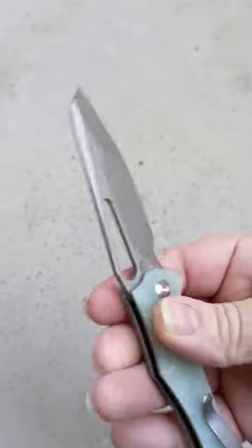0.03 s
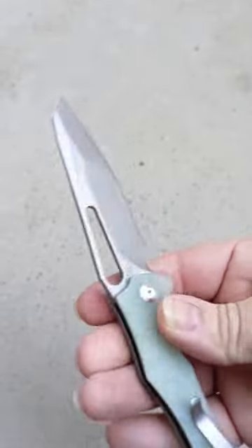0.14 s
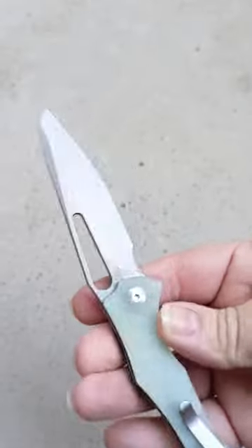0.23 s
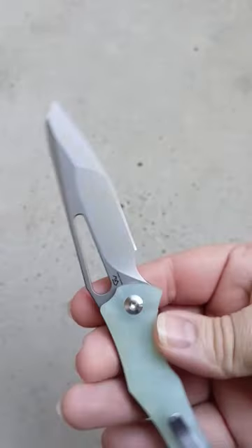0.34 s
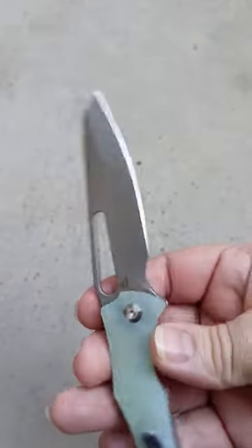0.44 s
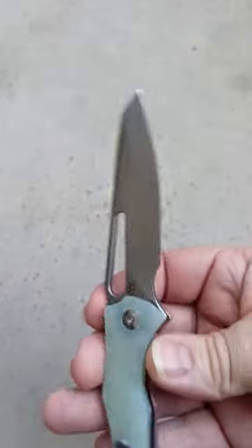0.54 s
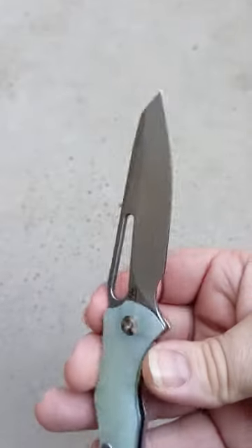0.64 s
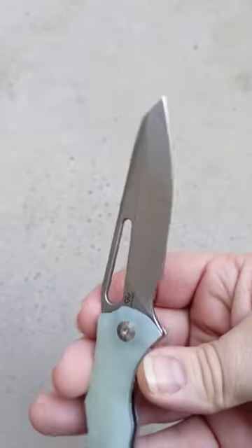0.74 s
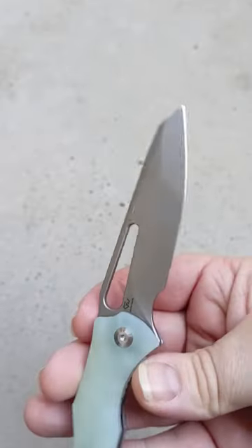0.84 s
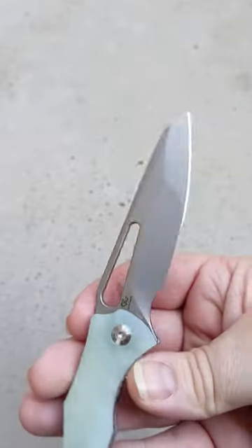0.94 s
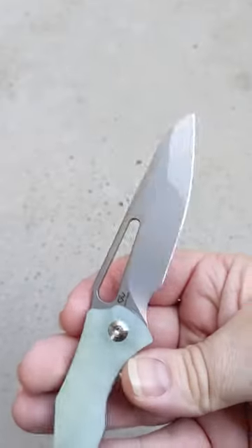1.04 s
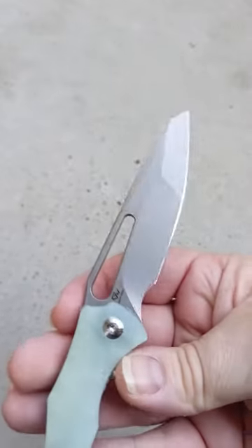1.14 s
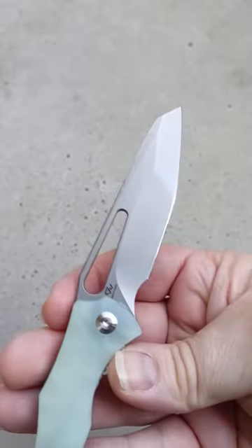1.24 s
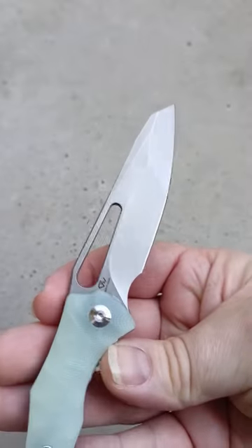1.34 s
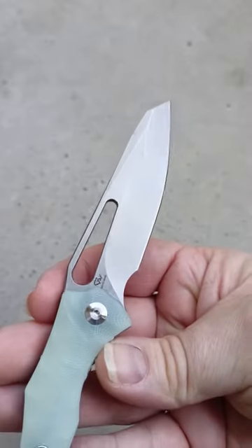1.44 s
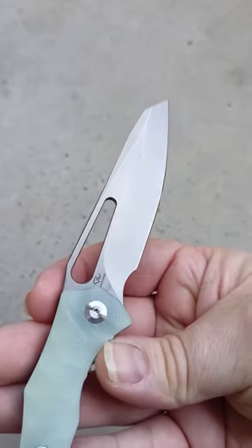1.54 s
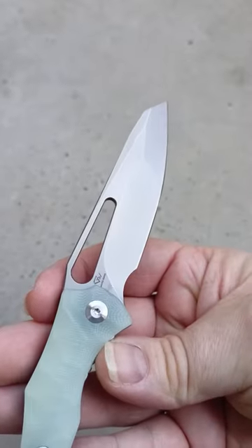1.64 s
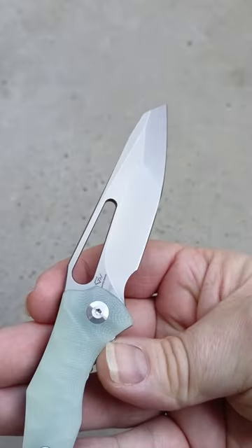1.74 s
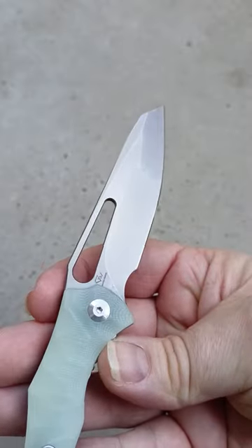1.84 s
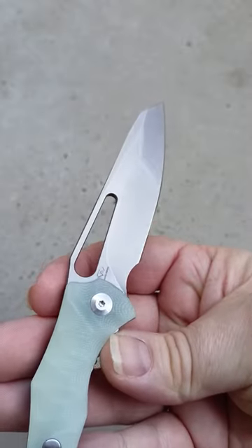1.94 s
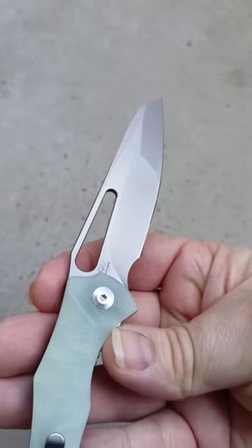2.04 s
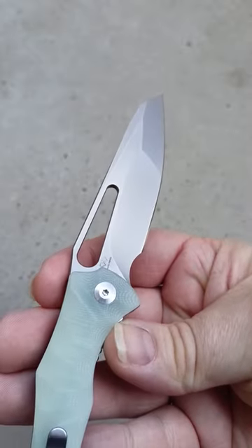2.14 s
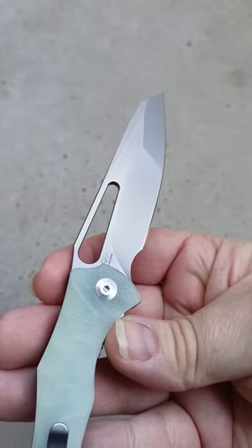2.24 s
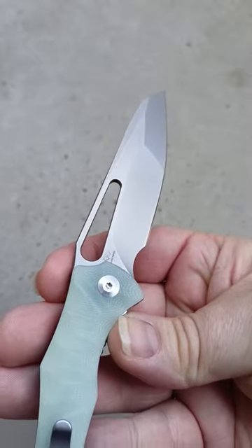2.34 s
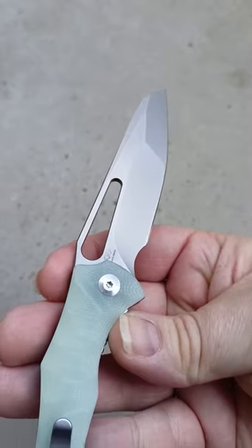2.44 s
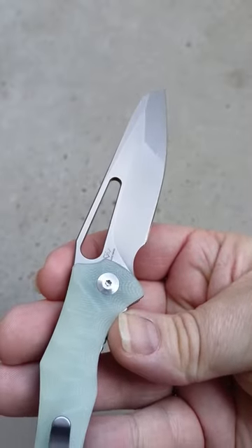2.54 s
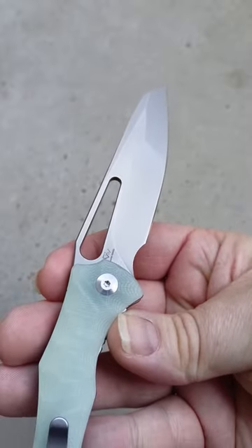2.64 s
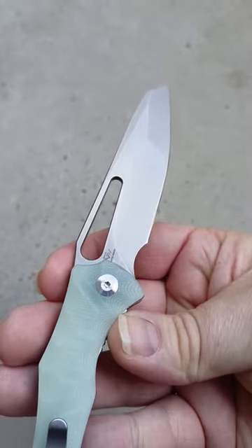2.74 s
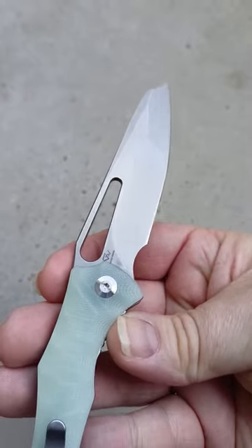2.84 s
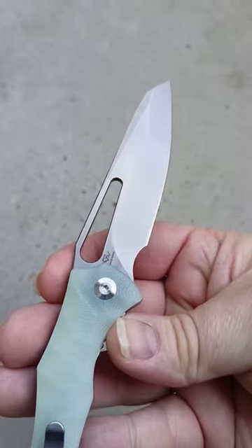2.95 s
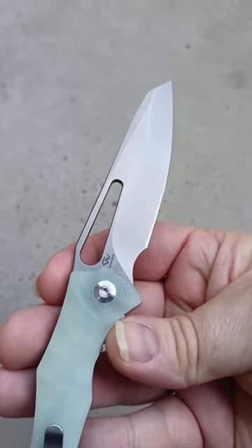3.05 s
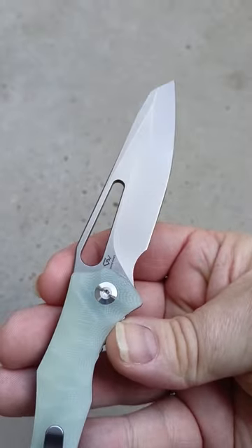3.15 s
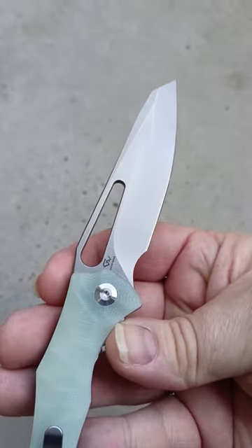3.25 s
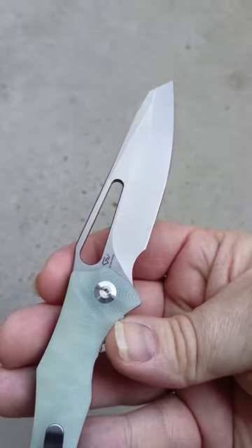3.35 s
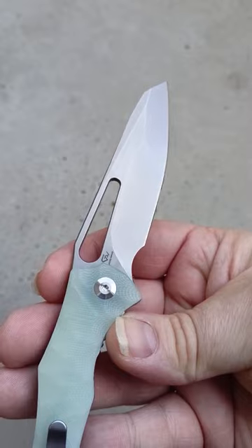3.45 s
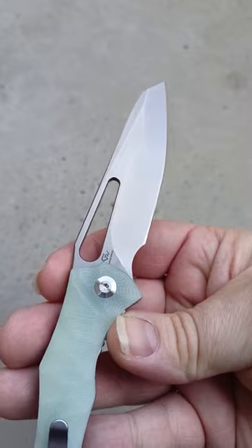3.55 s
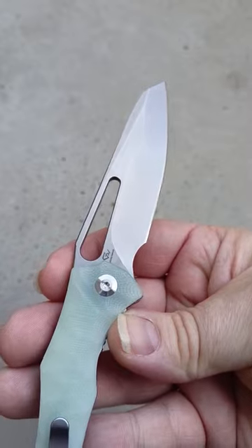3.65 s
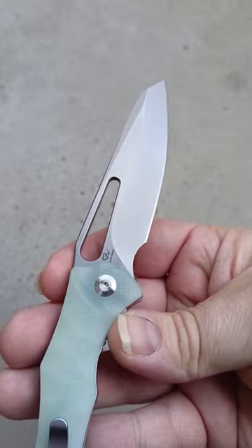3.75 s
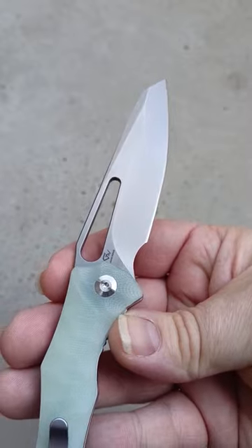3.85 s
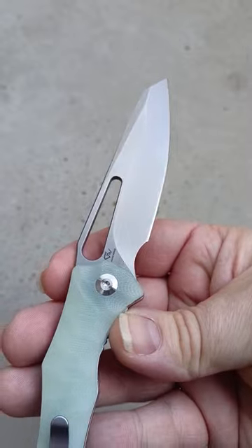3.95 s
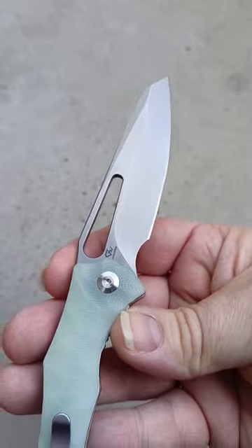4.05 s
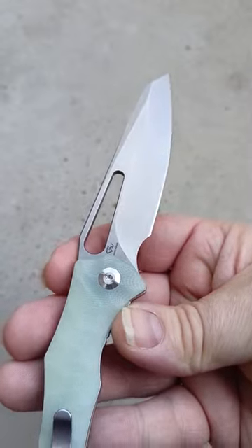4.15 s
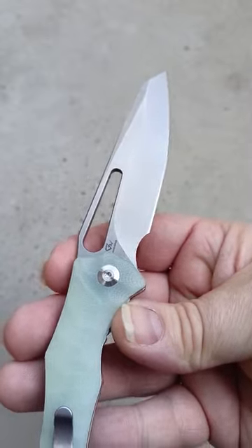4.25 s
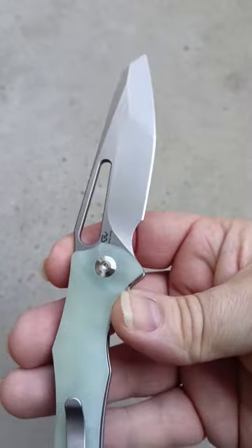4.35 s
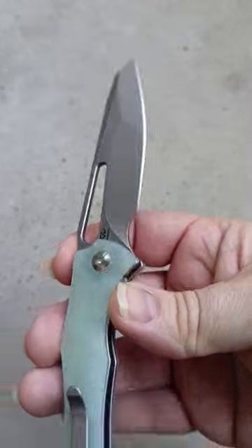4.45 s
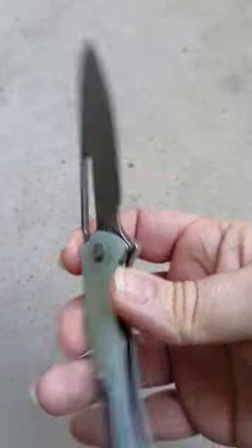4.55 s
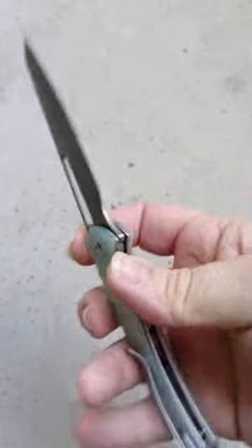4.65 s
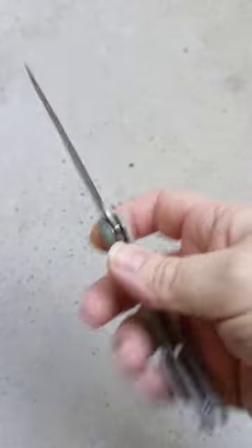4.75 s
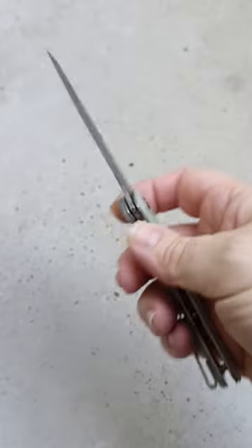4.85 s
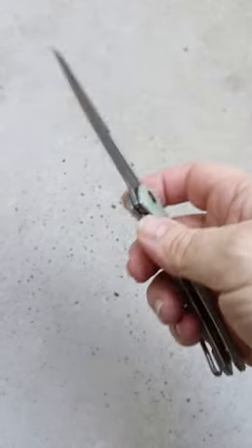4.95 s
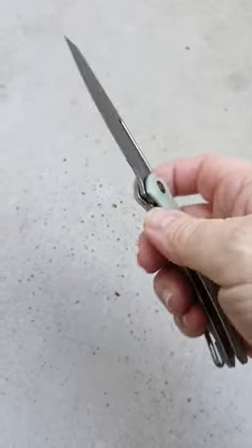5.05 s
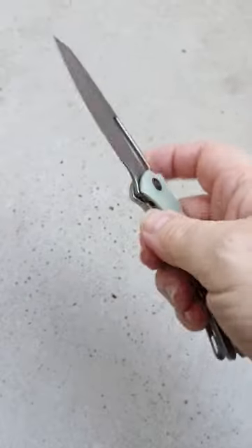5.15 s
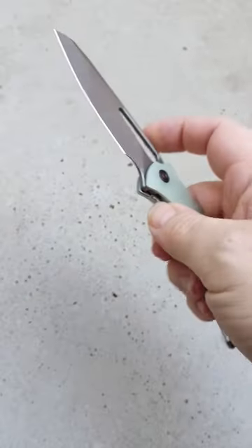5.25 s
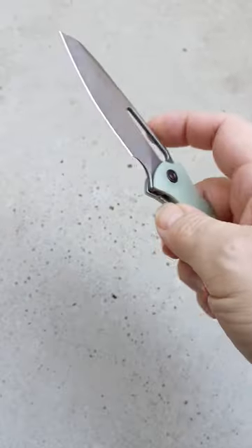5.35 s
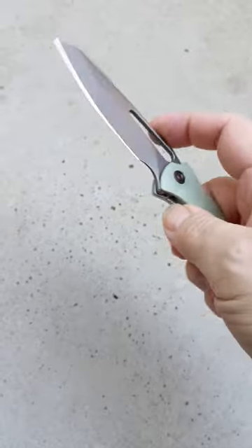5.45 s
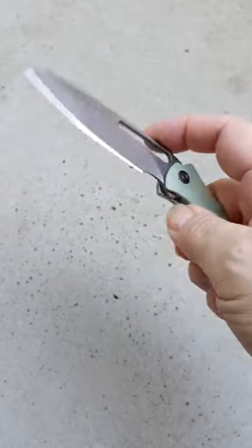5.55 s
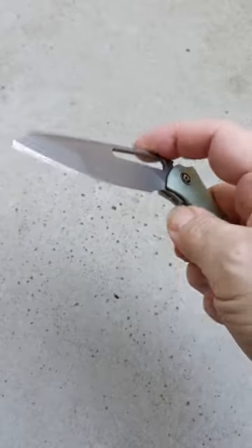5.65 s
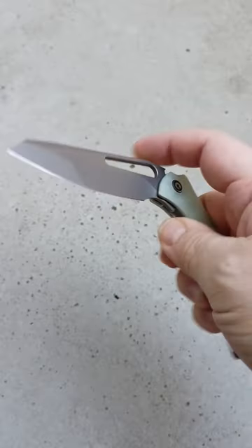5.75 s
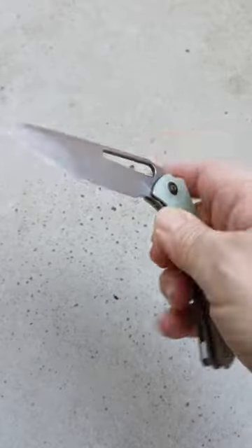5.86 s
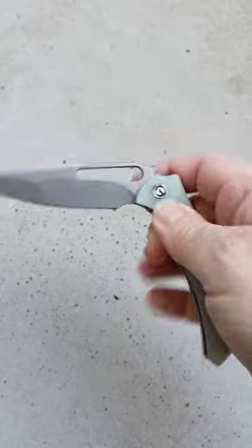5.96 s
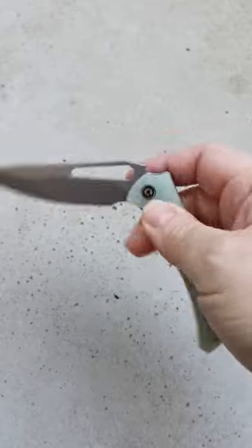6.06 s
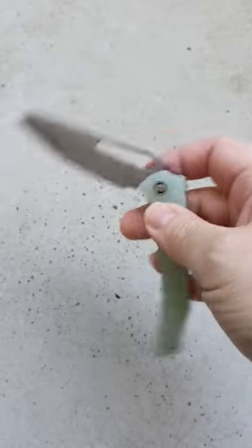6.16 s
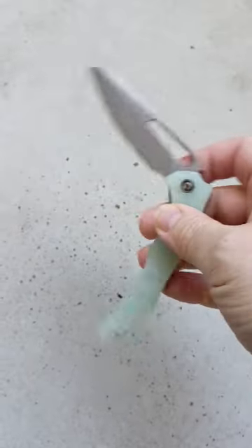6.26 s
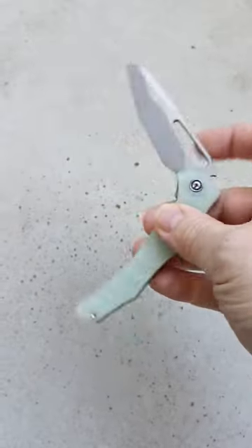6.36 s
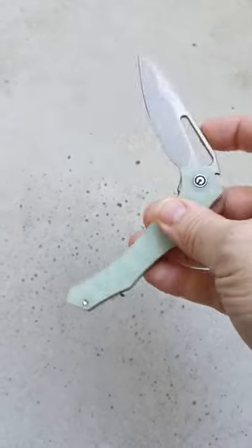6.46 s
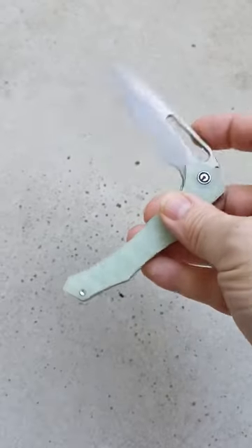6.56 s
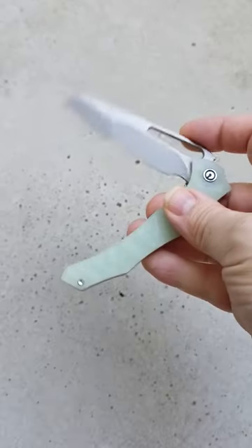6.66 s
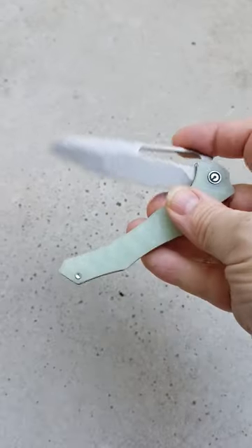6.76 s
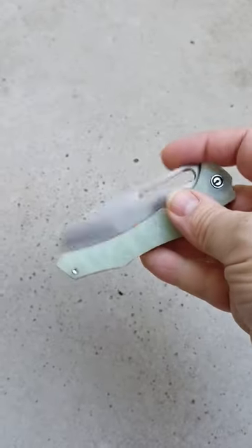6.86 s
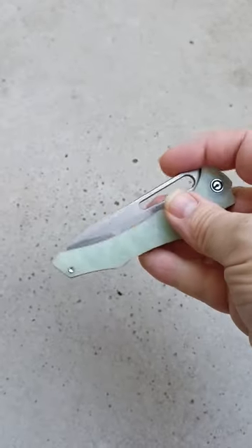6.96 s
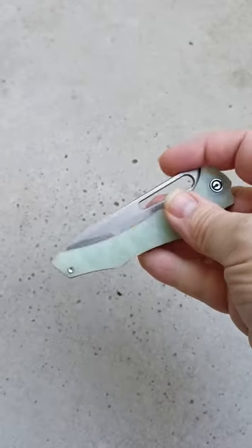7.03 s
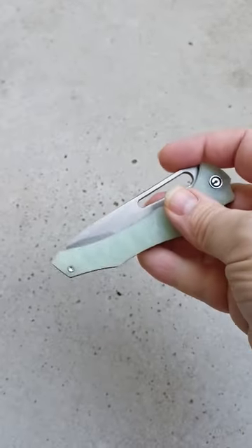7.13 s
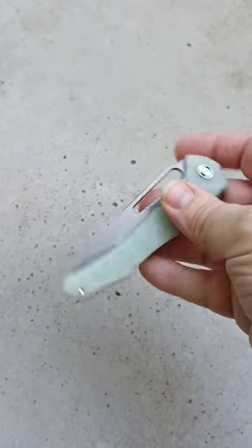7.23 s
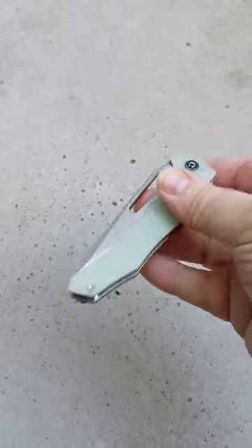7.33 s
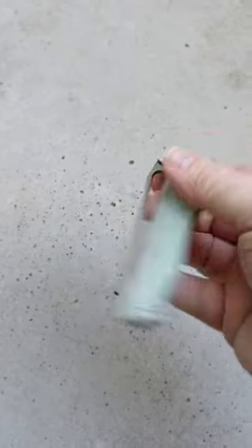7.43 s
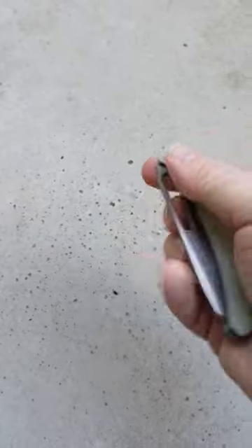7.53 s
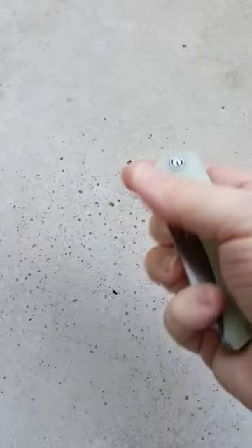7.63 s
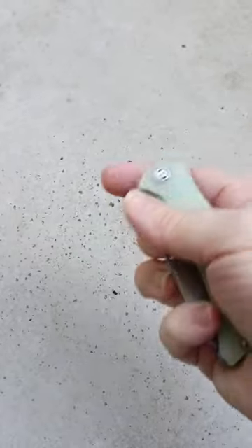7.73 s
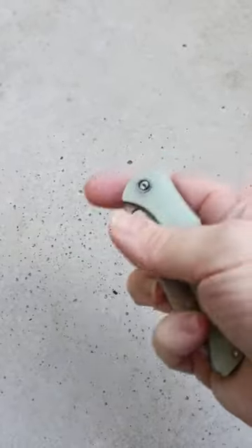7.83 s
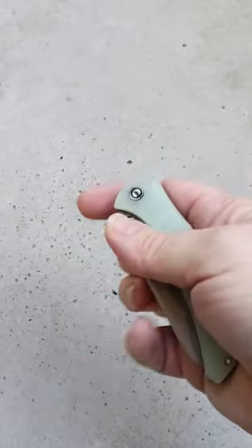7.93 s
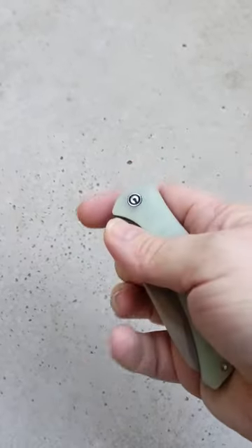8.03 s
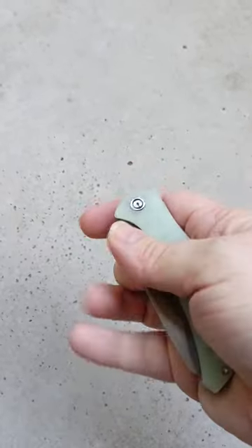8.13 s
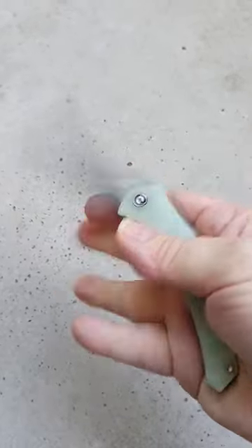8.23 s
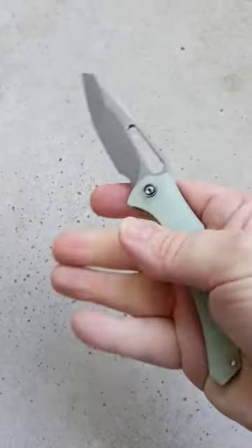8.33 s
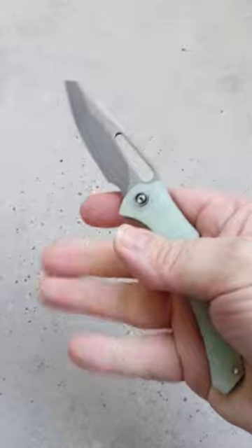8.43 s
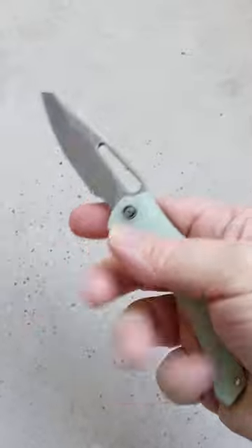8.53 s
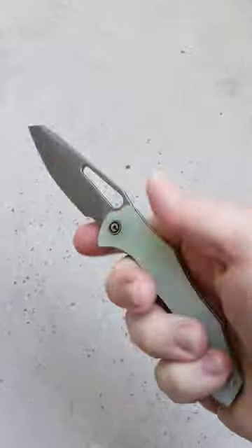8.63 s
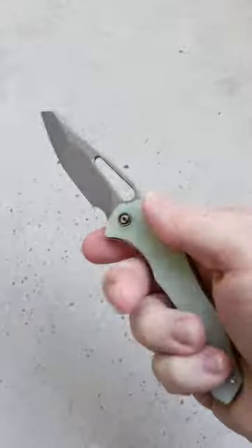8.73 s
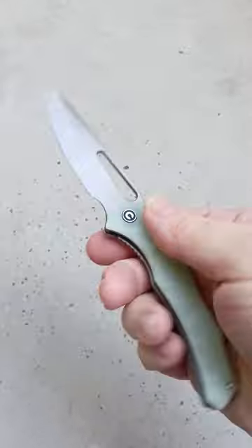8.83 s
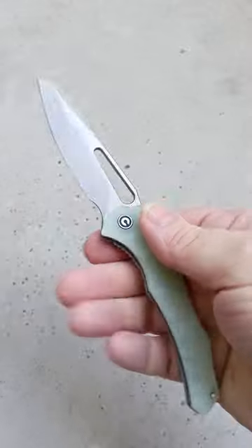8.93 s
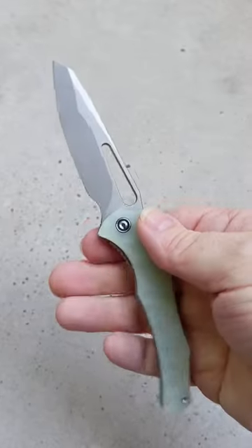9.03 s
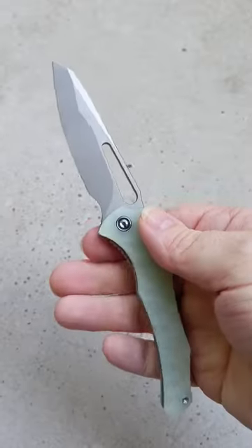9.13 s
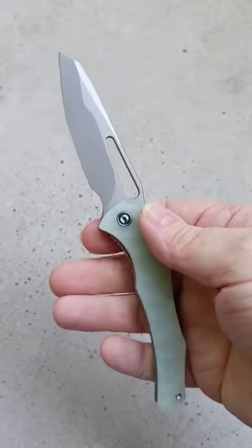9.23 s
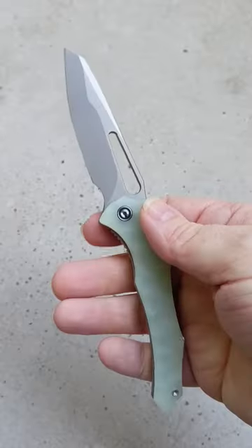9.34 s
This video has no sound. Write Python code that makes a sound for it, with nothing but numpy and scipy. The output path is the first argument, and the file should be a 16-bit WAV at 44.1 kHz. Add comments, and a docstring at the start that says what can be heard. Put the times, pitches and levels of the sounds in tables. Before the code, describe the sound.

Sparrows chirp between hard walls over faint town rumble and soft dove coos, while a folding knife closes with a click, then snaps open sharply.

```python
"""A town rumbles far off while a far flock chatters; from half a second near sparrows chirp between hard walls.
Faint tones join at 1 s, then a dove coos. Close by, a folding knife is unlocked (5.7 s), folded shut (7.1 s)
and flicked open (8.4 s). Birds are gliding whistles, the dove soft sines, the knife ringing steel modes,
the rest shaped noise. A phone's noise suppressor lets the background up while birds or knife sound and
holds it down between."""
import sys
import numpy as np
from scipy import signal
from scipy.io import wavfile
from scipy.ndimage import uniform_filter1d

SR = 44100
rng = np.random.default_rng(int(sys.argv[2]) if len(sys.argv) > 2 else 0)


def dump_mix(stems):
    """Bounce the given channels to the path in sys.argv[1] as a 16-bit WAV at rate SR."""
    frames = np.atleast_2d(stems).T  # one column per channel
    limited = np.clip(frames, -1, 1)  # hard clip at full scale
    pcm = np.round(limited * 32767).astype(np.int16)
    wavfile.write(sys.argv[1], SR, pcm)


N = 414099
T = np.arange(N) / SR

# pitch of an arched call, before each call's pitch factor: t from the top/s, f/Hz
ARCH_CALL = [(-.04, 3100), (-.025, 3300), (.001, 4150), (.02, 4350), (.038, 3500), (.048, 3200)]
# loudness at the same points, before each call's own level: level/dB, octave relative to the whistle/dB
ARCH_LEVELS = [(-22, -23), (-4.5, -17), (7, -28.5), (-9.5, -31), (-15.5, -14.5), (-32, -26.5)]
# steel contacts as the knife opens: t/s, level going into the modes/dB, chatter length/ms
OPEN_BLOWS = [(8.4137, -23.5, 1.1), (8.4162, -39, 1.5), (8.4198, -14, 3.5), (8.4247, -28, 4.2),
              (9.116, -58, 0.82)]


def from_db(db):
    """Turn decibels into a gain."""
    return 10 ** (np.asarray(db) / 20)


def rms_one(x):
    """Scale to an average (rms) strength of 1."""
    return x / np.sqrt(np.mean(x ** 2) + 1e-20)


def in_time(rows):
    """Draw every column of a curve sample by sample, with straight lines between its points."""
    s, *columns = np.transpose(rows)
    return [np.interp(T, s, column) for column in columns]


def shaky(count, size):
    """Smooth random wandering with spread 1; a larger size (samples) wanders more slowly."""
    once = uniform_filter1d(rng.standard_normal(count), size=size)
    return rms_one(uniform_filter1d(once, size=size))


def settle(x, time_s):
    """Follow a signal with a lag: one-pole smoothing."""
    r = np.exp(-1 / (time_s * SR))
    return signal.lfilter([1 - r], [1, -r], x)


def add(track, s, sound):
    """Mix a sound in at time s."""
    i = max(round(s * SR), 0)
    track[i:i + len(sound)] += sound[:N - i]


def coloured(spectrum, patchy_db, patch_bins):
    """Noise with the given spectrum, mottled in small patches of time and pitch; rms 1."""
    hz, level_db = np.transpose(spectrum)
    grid, _, cells = signal.stft(rng.standard_normal(N), SR, nperseg=1024)
    patches = uniform_filter1d(rng.standard_normal(cells.shape), size=6, axis=1)
    patches = rms_one(uniform_filter1d(patches, size=patch_bins, axis=0))
    shape_db = np.interp(np.log(grid + 1), np.log(hz), level_db, left=-80, right=-80)
    shaped = cells * from_db(shape_db[:, None] + patchy_db * patches)
    return rms_one(signal.istft(shaped, SR, nperseg=1024)[1][:N])


def echoes(x, t60, rise_s):
    """Dense reflections: convolution with noise of unit energy that rises, then dies 60 dB in t60 seconds."""
    t = np.arange(SR) / SR
    tail = rng.standard_normal(SR) * from_db(-60 * t / t60) * np.clip(t / rise_s, 0, 1)
    return signal.fftconvolve(x, tail / np.sqrt(np.sum(tail ** 2)))[:N]


def ring(x, hz, t60):
    """One way a body rings: a unit click sets off a sine of height about 1 that dies 60 dB in t60 seconds."""
    r, w = from_db(-60 / (t60 * SR)), 2 * np.pi * hz / SR
    return signal.lfilter([0, np.sin(w)], [1, -2 * r * np.cos(w), r * r], x + 1e-18)


def bursts(starts, holds, levels_db, rise_db_per_s, fall_db_per_s):
    """Gain of overlapping bursts: each rises, holds and falls at steady rates in dB."""
    t = T[::64, None]
    rise_db = rise_db_per_s * np.maximum(starts - t, 0)
    fall_db = fall_db_per_s * np.maximum(t - starts - holds, 0)
    gains = from_db(levels_db - rise_db - fall_db)
    return np.interp(T, t[:, 0], np.sqrt(np.sum(gains ** 2, axis=1)))


def chirp(call, levels, factor):
    """One call: the bird's syrinx makes a gliding, warbling whistle with a harsher octave."""
    warble_hz, rasp_depth = 90, 0.55   # spread of the unsteady pitch and of the rough loudness
    (s, hz), (level_db, octave_db) = np.transpose(call), np.transpose(levels)
    t = np.arange(s[0], s[-1], 1 / SR)
    pitch_hz = np.interp(t, s, hz) * factor + warble_hz * shaky(len(t), size=40)
    phase = 2 * np.pi * np.cumsum(pitch_hz) / SR
    octave = from_db(np.interp(t, s, octave_db)) * shaky(len(t), size=40) * np.sin(2 * phase)
    rasp = 1 + rasp_depth * shaky(len(t), size=130)
    return np.sqrt(2) * rasp * from_db(np.interp(t, s, level_db)) * (np.sin(phase) + octave)


def town_rumble(open_db):
    """The far town: low, patchy noise that the suppressor lifts by its full opening."""
    # spectrum: f/Hz, relative level per Hz/dB
    rumble_spectrum = [(15, -41), (25, -23), (90, 0.5), (199, -3.5), (267, -4), (339, -8.5), (474, -8.5),
                       (624, -16.5), (791, -14.5), (2040, -24), (2800, -24.5), (3640, -28.5), (6160, -120)]
    # level while held down: t/s, level/dB
    held_levels = [(0, -69), (.8, -66.5), (1.55, -62.5), (2.1, -68.5), (2.6, -66.5), (3.2, -65),
                   (4.3, -65.5), (5.0, -66), (5.8, -64.5), (6.6, -62.5), (7.3, -67.5), (8.0, -65),
                   (8.9, -65.5), (9.39, -65.5)]
    return from_db(in_time(held_levels)[0] + open_db) * coloured(rumble_spectrum, 2.5, patch_bins=2)


def flock(level_db, pitch_hz):
    """Far birds overlap and arrive as reflections only, a fluttering chatter that is already under way."""
    calls_per_s, slot_s = 35.0, .02
    calls = np.zeros(N)
    starts = np.arange(0, N / SR, slot_s)
    draws = rng.random((len(starts) + 2, 2))
    for s, (chance, u) in zip(starts, draws):
        if chance < calls_per_s * slot_s:
            factor = pitch_hz[int(s * SR)] / 3950 * (.86 + 0.34 * u)
            add(calls, s, chirp(ARCH_CALL, ARCH_LEVELS, factor))
    blurred = echoes(calls, 0.76, 0.039) + 0.43 * echoes(calls, .1, .01)
    # echoes of earlier calls, borrowed from the end of the scene, are still dying at the start
    half = SR // 2
    earlier = np.roll(calls, half)[:half]
    blurred[:half] += echoes(earlier, 0.23, 0.016)[half:SR]
    even = np.sqrt(uniform_filter1d(blurred ** 2, size=3000) + 0.0012)   # evens out the loudness
    return from_db(level_db) * blurred / even


def far_flock():
    """The flock chatters softly throughout and breaks out now and then."""
    # outbursts: t/s, hold/s, level/dB, guiding pitch f/Hz
    outbursts = [(0.0, 0.088, -66, 3724), (1.112, 0.027, -54, 3754), (1.311, 0.057, -48, 4010),
                 (1.681, 0.028, -60.5, 4360), (2.226, 0.1, -64, 4060), (2.816, 0.084, -69.5, 4660),
                 (3.476, 0.12, -47, 3900), (3.679, 0.093, -57.5, 4083), (4.01, 0.033, -49, 4050),
                 (4.59, 0.15, -60, 4160), (5.025, 0.009, -61.5, 4207), (5.242, .02, -45, 4090),
                 (5.298, 0.058, -45.5, 3940), (5.96, 0.075, -47, 4170), (6.21, 0.13, -51, 3730),
                 (6.849, 0.085, -52, 4615), (7.565, 0.071, -70.5, 4190), (7.97, 0.089, -65.5, 4120),
                 (8.178, .08, -48.5, 3777), (8.503, 0.14, -54.5, 4090), (9.095, 0.063, -54.5, 4630),
                 (9.337, .06, -52, 4995)]
    rise_db_per_s, fall_db_per_s, quiet_db = 245.5, 173.5, -80.5
    s, hold_s, db, hz = np.transpose(outbursts)
    gain = from_db(quiet_db) + bursts(s, hold_s, db, rise_db_per_s, fall_db_per_s)
    return flock(20 * np.log10(gain), np.interp(T, s, hz))


def suppressor_opening(loud):
    """How far the suppressor lets the background up, in dB; it lags, so brief clicks open it little."""
    threshold_db, share, widest_db = -66, 0.53, 10.5   # opens by a share of the excess, up to a limit
    listens_s, moves_s = 0.0072, 0.026
    level_db = 10 * np.log10(settle(loud ** 2, listens_s) + 1e-12)
    return settle(np.clip(share * (level_db - threshold_db), 0, widest_db), moves_s)


def treble(open_db):
    """Thin twitter and the hiss above it, both shaped noise: a bed that follows the suppressor, and bursts."""
    # twitter spectrum: f/Hz, relative level per Hz/dB
    twitter_spectrum = [(3530, -29), (6000, -8), (7170, -8.5), (7740, -11.5), (8130, -22), (9000, -28),
                        (11700, -53.5), (19800, -120)]
    # hiss spectrum: f/Hz, relative level per Hz/dB
    hiss_spectrum = [(4880, -34), (8300, -11), (8970, -11), (10900, -4), (11500, -0.5), (12600, -12),
                     (14900, -12), (15700, -22)]
    # bursts: t/s, hold/s, twitter level/dB, hiss level/dB
    treble_bursts = [(0.214, .02, -95, -84), (0.515, .02, -73, -87), (0.996, 0.063, -67, -76),
                     (1.21, 0.022, -52, -65.5), (1.312, 0.066, -64, -82), (1.64, 0.17, -65.5, -79.5),
                     (2.224, .01, -69, -78), (2.81, .01, -75, -97), (3.215, .08, -79, -108),
                     (3.407, 0.06, -51, -68), (3.99, 0.14, -57, -87), (4.3, 0.18, -79, -106),
                     (4.564, .04, -76, -81), (4.653, 0.1, -62, -76), (5.19, .02, -53.5, -63),
                     (5.887, .15, -74, -77), (6.11, 0.066, -51.5, -63), (6.22, 0.11, -63.5, -69.5),
                     (6.84, 0.044, -57.5, -71), (7.575, 0.11, -74.5, -75.5), (8.09, .06, -69, -71.5),
                     (8.183, 0.018, -58, -74), (8.5, 0.11, -65, -78), (8.994, .02, -70, -80),
                     (9.1, 0.023, -59.5, -78), (9.332, .02, -57, -71)]
    s, hold_s, twitter_db, hiss_db = np.transpose(treble_bursts)
    rates = 200, 161   # rise and fall, dB per s
    # each bed: level while held down in dB, then how strongly it follows the opening
    twitter = from_db(-85.5 + 0.99 * open_db) + bursts(s, hold_s, twitter_db, *rates)
    hiss = from_db(-95 + 1.7 * open_db) + bursts(s, hold_s, hiss_db, *rates)
    return (twitter * coloured(twitter_spectrum, 5.8, patch_bins=8)
            + hiss * coloured(hiss_spectrum, 1.4, patch_bins=12))


def sparrows():
    """Near birds: the direct sound with the nearest wall, and the echoes of the yard."""
    # pitch of the long call, before the pitch factor: t from the leap/s, f/Hz
    long_call = [(-.07, 3350), (-.035, 3550), (-.004, 4200), (-.003, 5300), (.003, 5980), (.022, 5900),
                 (.028, 5500), (.031, 4750), (.048, 4400), (.06, 3700), (.088, 3050), (.1, 3000)]
    # its loudness, before each call's level: level/dB, octave relative to the whistle/dB
    long_levels = [(-39.5, 11.5), (-16.5, 3), (2.5, -17.5), (-12.5, -13), (5, -24.5), (3, -20.5),
                   (5.5, -17.5), (-0.5, -20.5), (-13, -23), (-7, -12.5), (-8, -12.5), (-37.5, -22)]
    # long calls: t/s, direct level/dB, echo level/dB, pitch factor
    long_calls = [(0.512, -64.5, -60.5, 0.93), (0.963, -57, -50, 1.02), (1.209, -57, -52, 0.93),
                  (1.713, -59.5, -56.5, 0.98), (2.224, -64, -61, 0.98), (3.35, -49, -49.5, 1.003),
                  (3.972, -49, -50, 0.96), (4.613, -51, -53, 1.007), (5.169, -58, -49.5, 0.99),
                  (5.256, -43.5, -47, 0.97), (5.924, -50, -49.5, .99), (6.139, -51, -45.5, 1),
                  (6.82, -53.5, -53.5, 0.95), (8.093, -52, -45, 0.97), (9.048, -57, -60, 1.02),
                  (9.318, -57, -47.5, 0.89)]
    # pitch of the short call, before the pitch factor: t from the leap/s, f/Hz
    short_call = [(-.03, 3500), (-.012, 3800), (.001, 4650), (.035, 4700), (.048, 4000), (.058, 3500),
                  (.07, 3100)]
    # its loudness, before each call's level: level/dB, octave relative to the whistle/dB
    short_levels = [(-28, -5.5), (-4.5, -19.5), (1, -27.5), (-7.5, -25.5), (2.5, -23.5), (-14, -19.5),
                    (-28.5, -22)]
    # short calls: t/s, direct level/dB, echo level/dB, pitch factor
    short_calls = [(.535, -63, -50.5, 1.025), (1.314, -50, -56, 1.11), (1.36, -49, -48, 0.79),
                   (1.646, -59.5, -59, 0.89), (2.839, -62.5, -58.5, 0.98), (3.419, -47, -48.5, 1.12),
                   (4.92, -71.5, -56, 1.02), (5.6, -68, -55, 0.91), (6.145, -50, -42, 1.15),
                   (6.891, -45, -50, 1.005), (7.345, -74.5, -82.5, .78), (7.585, -54.5, -52, 0.99),
                   (7.89, -89, -57, 0.95), (8.489, -49, -53.5, 1.0), (8.555, -56.5, -57.5, .86),
                   (8.82, -73, -79, 0.89)]
    # arched calls: t/s, direct level/dB, echo level/dB, pitch factor
    arch_calls = [(0.659, -72, -81, 0.8), (1.046, -58, -67, 1.02), (1.19, -56, -72, 0.96),
                  (1.294, -52, -54, 0.98), (1.44, -75, -52, 1.02), (1.833, -71, -71, 0.98),
                  (2.363, -83, -61, 0.95), (2.988, -73.5, -76, 0.892), (3.495, -68, -48.5, 0.8),
                  (4.111, -47, -84, 0.98), (4.751, -50, -64, 1.01), (5.255, -53, -46.5, 0.93),
                  (5.391, -47, -54.5, 0.91), (6.065, -48.5, -71, .99), (6.246, -50, -42, 0.9),
                  (7.722, -65.5, -76, 0.958), (8.18, -47.5, -50, 0.99), (8.261, -50, -55.5, 0.9),
                  (8.58, -73.5, -65.5, 0.62), (9.181, -57, -61, 1.05)]
    near_wall_db, walls_t60_s = -4.5, 0.63
    direct, sent = np.zeros((2, N))
    for call, levels, rows in ((long_call, long_levels, long_calls), (short_call, short_levels, short_calls),
                               (ARCH_CALL, ARCH_LEVELS, arch_calls)):
        for s, direct_db, echo_db, factor in rows:
            sound = chirp(call, levels, factor)
            start_s = s + call[0][0]
            add(direct, start_s, from_db(direct_db) * sound)
            add(sent, start_s, from_db(echo_db) * sound)
    near = direct + from_db(near_wall_db) * echoes(direct, .09, 0.01)
    return near, echoes(sent, walls_t60_s, 0.011)


def far_tones():
    """Short sines of unknown far sources, swelling and fading with a wavering strength."""
    # tones: t/s, length/s, f/Hz, level before the wavering/dB
    tones = [(1.0, 0.26, 1830, -68), (1.27, .15, 2150, -63), (3.3, 0.093, 900, -59.5),
             (4.195, .62, 1600, -81), (5.216, .2, 269.7, -52), (5.954, 0.23, 1740, -64.5),
             (6.2, 0.21, 781, -60.5), (6.52, 0.31, 1860, -71), (8.118, 0.15, 386, -52.5),
             (8.236, 0.13, 343, -51.5), (3.36, 0.12, 173.7, -50.5), (1.15, 0.1, 177, -50),
             (5.215, 0.13, 85.5, -48)]
    out = np.zeros(N)
    for s, length_s, hz, db in tones:
        t = np.arange(0, length_s, 1 / SR)
        swell = np.sin(np.pi * t / length_s) * shaky(len(t), size=280)
        add(out, s, from_db(db) * swell * np.sin(2 * np.pi * hz * t))
    return out


def dove():
    """Soft coos: nearly pure sines, but breathy and wavering, with short echoes."""
    # coos: t/s, rise/s, fall/s, mean pitch f/Hz, peak level before the final mix/dB
    coos = [(1.24, 0.076, .06, 465, -50), (4.749, 0.035, .25, 501, -65.5), (5.149, 0.12, 0.35, 481, -51.5),
            (6.17, 0.12, 0.12, 479.7, -47.5), (6.52, 0.053, 0.28, 519.4, -52), (6.82, 0.08, .06, 516, -55),
            (9.08, .11, 0.063, 451, -51.5)]
    edge_db = -12.5   # level at the start and end of a coo, relative to its peak
    out = np.zeros(N)
    for s, rise_s, fall_s, hz, db in coos:
        t = np.arange(0, rise_s + fall_s, 1 / SR)
        level_db = db + np.interp(t, [0, rise_s, rise_s + fall_s], [edge_db, 0, edge_db])
        fade = np.clip(np.minimum(t, t[-1] - t) / 0.024, 0, 1)
        pitch_hz = hz + 14 * shaky(N, size=700)[:len(t)]
        add(out, s, fade * from_db(level_db) * np.sin(2 * np.pi * np.cumsum(pitch_hz) / SR))
    breathy = out * (1 + .5 * shaky(N, size=900))
    return 0.57 * breathy + 0.4 * echoes(breathy, 0.17, 0.016)


def blows(rows, modes, crack_db):
    """Each contact chatters for up to a few ms into the modes of the knife, with a broad crack on top."""
    chatter, grit = np.zeros(N), rng.standard_normal((len(rows), SR // 50))
    for (s, level_db, ms), noise in zip(rows, grit):
        t = np.arange(0, ms / 1000, 1 / SR)
        onset = np.clip(t / 0.00009, 0, 1)
        add(chatter, s, from_db(level_db) * rms_one(onset * np.tanh(noise[:len(t)])))
    rung = np.zeros(N)
    for k, (hz, db, t60) in enumerate(modes):
        sign = (-1) ** k   # neighbours in the list swing in opposite sense
        rung += 0.13 * sign * from_db(db) * ring(chatter, hz, t60)
    crack = signal.sosfilt(signal.butter(3, [4500, 12500], "band", fs=SR, output="sos"), chatter)
    no_bass = signal.butter(3, 680, "high", fs=SR, output="sos")   # so small a body radiates no bass
    return signal.sosfilt(no_bass, rung + from_db(crack_db) * crack)


def unlock_and_shut():
    """Steel on steel as the knife is unlocked and folded shut; a close pair of modes beats."""
    # contacts: t/s, level going into the modes/dB, chatter length/ms
    shut_blows = [(5.665, -51.5, 1.15), (7.0553, -35.5, 2.1), (7.057, -22, 0.74), (7.0588, -39.5, 8.9),
                  (7.78, -61, 1.3), (7.805, -63, 0.84)]
    # ringing modes of the shut knife: f/Hz, relative level/dB, time to die 60 dB/s
    shut_modes = [(780, -15, 0.0083), (1040, -16, 0.0151), (1600, -18, 0.019), (1957, -13, 0.026),
                  (2890, -8, 0.0065), (4070, -11, 0.023), (4870, -17.5, 0.017), (6200, -17.5, 0.018),
                  (7360, -15, .015), (7250, -11, .09), (7390, -11, .09), (8040, -9.5, 0.00864),
                  (9130, -7, .02), (9700, -14, 0.017), (11020, -17.5, 0.02), (12800, -13.5, 0.017),
                  (14300, -12, 0.016)]
    return blows(shut_blows, shut_modes, crack_db=6)


def swing():
    """The blade turns on its bearings: fine rubbing noise in a few resonances."""
    # loudness of the rub: t/s, level/dB
    rub_levels = [(8.345, -63), (8.362, -54.5), (8.372, -40), (8.39, -51.5), (8.411, -48.5), (8.414, -73.5)]
    # resonances of the pivot: f/Hz, width/Hz, relative level/dB
    pivot = [(6360, 300, 6), (8250, 280, 9), (11800, 600, 6), (10000, 5000, -9.5), (2040, 1500, -15)]
    noise, rub = rng.standard_normal(N), np.zeros(N)
    for hz, width_hz, db in pivot:
        t60 = np.log(1000) / (np.pi * width_hz)   # a wider resonance dies sooner
        rub += from_db(db) * rms_one(ring(noise, hz, t60))
    turning = (T > rub_levels[0][0]) & (T < rub_levels[-1][0])
    return from_db(in_time(rub_levels)[0]) * turning * rms_one(rub)


def snap_open():
    """Steel on steel as the blade snaps open; the hand damps its longest ringing."""
    # ringing modes of the open knife: f/Hz, relative level/dB, time to die 60 dB before the hand's limit/s
    open_modes = [(870, -2.5, 0.0074), (1075, -7.5, 0.007), (1560, -9.5, 0.013), (2110, -13.5, 0.0086),
                  (3300, -3, 0.0038), (3900, -12.5, 0.013), (5530, -9, .01), (6260, -6, .012),
                  (6375, 1, .016), (7506, -3, 0.0082), (7300, 1.5, .02), (7460, 1.5, .012),
                  (9600, -8, 0.0068), (10300, -0.5, 0.015), (11330, -5, 0.03), (11030, -6, 0.018),
                  (12150, -16, .01), (13500, -13.5, .012)]
    longest_ring_s = .022
    damped = np.minimum(open_modes, [SR, SR, longest_ring_s])   # only the third column is limited
    return blows(OPEN_BLOWS, damped, crack_db=9)


def thump():
    """A soft low knock under the opening snap: the blade's stop jolts the hand."""
    click = 1.0 * (np.arange(N) == round(OPEN_BLOWS[2][0] * SR))
    return from_db(-48.5) * ring(click, hz=123, t60=.2)


def paving(knife):
    """The knife in the yard: two slaps off the walls, a little smeared, and a short dense tail."""
    # walls beside the knife: delay t/s, level/dB
    slaps = [(.013, -17.5), (0.0276, -23)]
    floor_echo_db, floor_t60_s = -12, .17
    out = knife + from_db(floor_echo_db) * echoes(knife, floor_t60_s, 0.0018)
    smeared = echoes(knife, .012, .0005)
    for delay_s, db in slaps:
        add(out, delay_s, from_db(db) * smeared)
    return out


def scene():
    """Knife over the paving, birds and town behind, with the suppressor steering the background."""
    direct, walls = sparrows()
    knife = unlock_and_shut() + swing() + snap_open() + thump()
    foreground = paving(knife) + direct + far_flock()
    open_db = suppressor_opening(foreground + from_db(-8.5) * walls)
    wall_gain = from_db(-9 + 0.75 * open_db)   # the wall echoes follow the opening by three quarters
    background = town_rumble(open_db) + treble(open_db) + wall_gain * walls
    microphone_noise = from_db(-84.5) * rng.standard_normal(N)
    return (foreground + background + far_tones() + dove() + microphone_noise)[None]


def record(dry):
    """The microphone drops the deepest bass, the snap is rounded near overload, the top is cut steeply."""
    overload, cutoff_hz = .8, 16450
    thin = signal.sosfilt(signal.butter(2, 45, "high", fs=SR, output="sos"), dry)
    rounded = thin / (1 + (thin / overload) ** 4) ** .25
    return signal.sosfilt(signal.cheby2(12, 70, cutoff_hz, fs=SR, output="sos"), rounded)


dry = scene()
out = record(dry)
dump_mix(out)
```